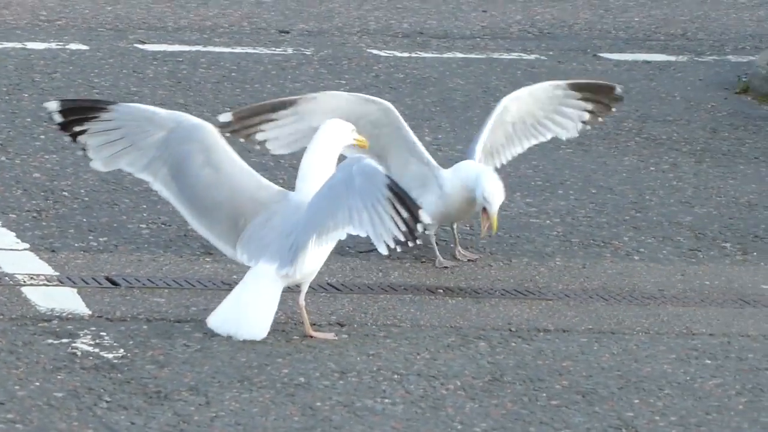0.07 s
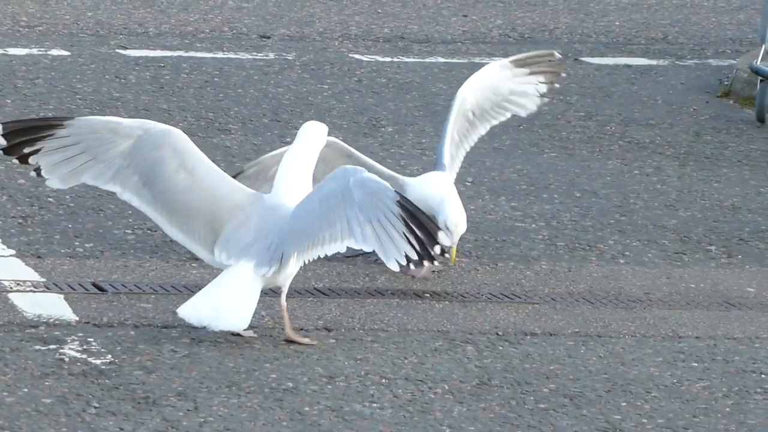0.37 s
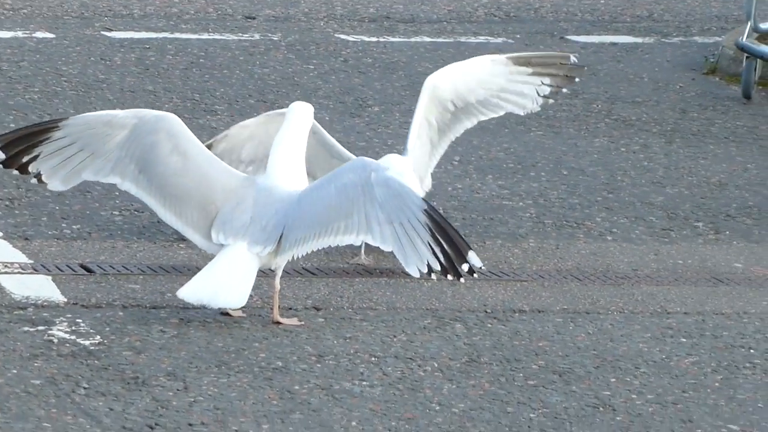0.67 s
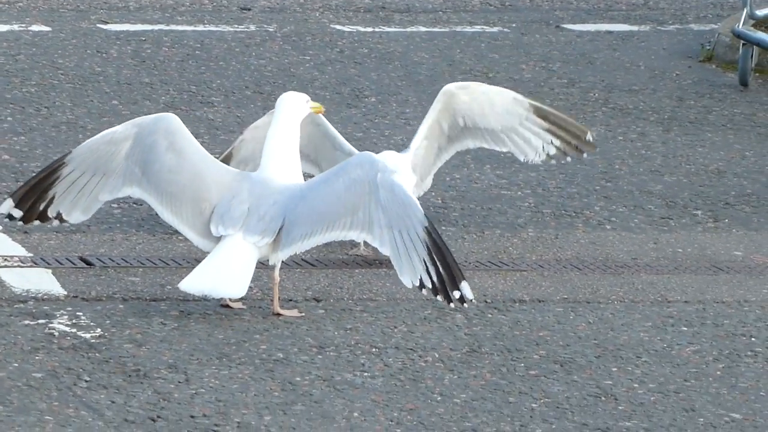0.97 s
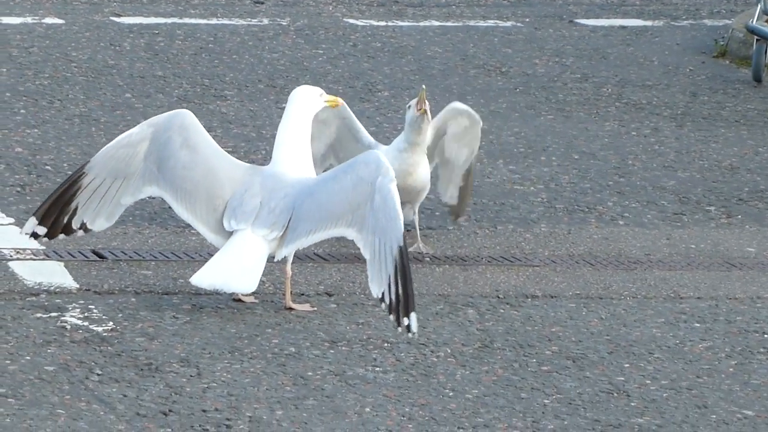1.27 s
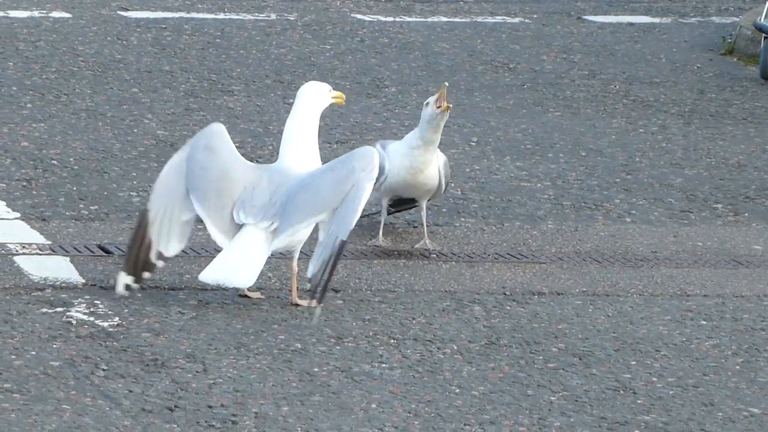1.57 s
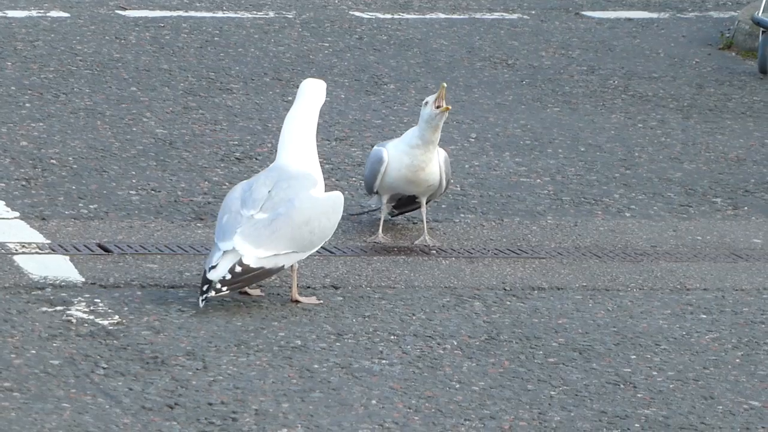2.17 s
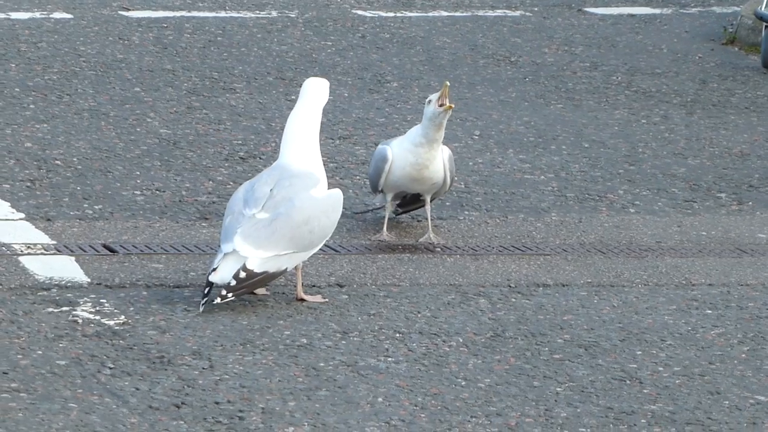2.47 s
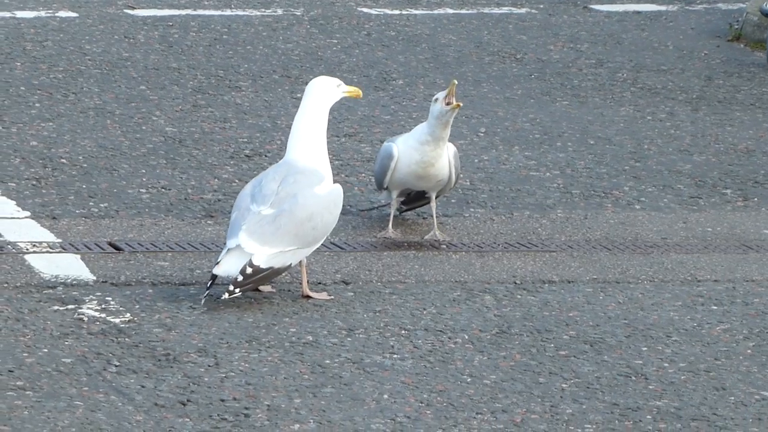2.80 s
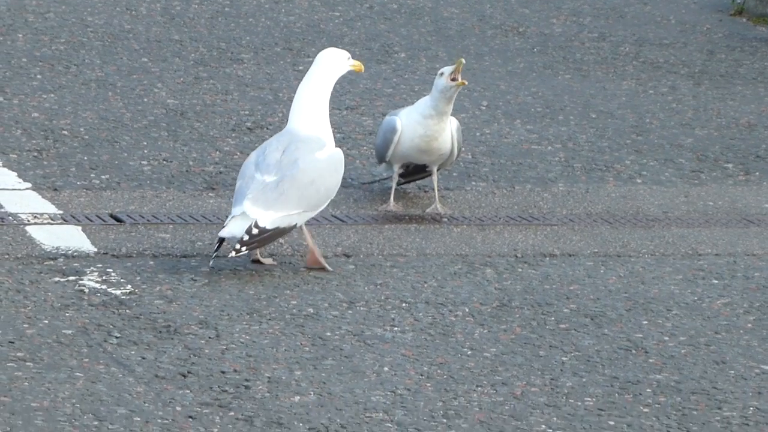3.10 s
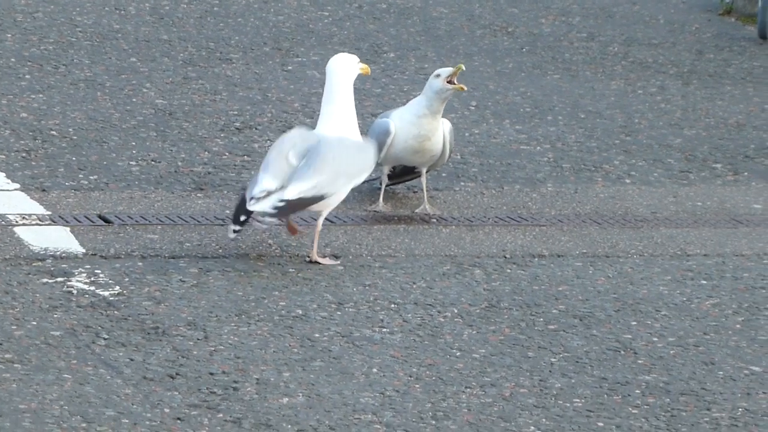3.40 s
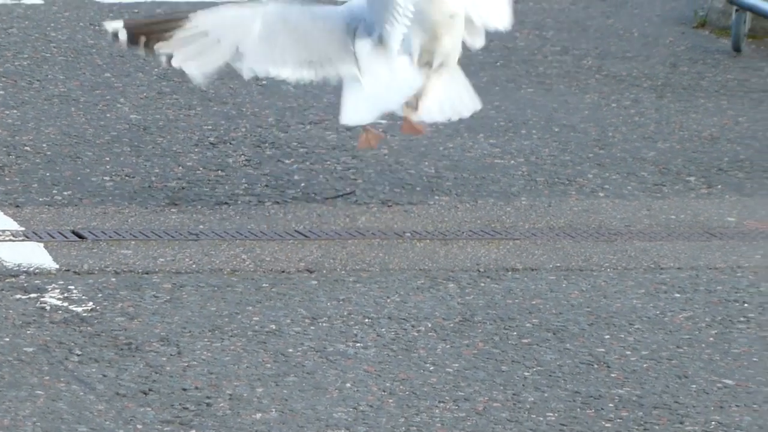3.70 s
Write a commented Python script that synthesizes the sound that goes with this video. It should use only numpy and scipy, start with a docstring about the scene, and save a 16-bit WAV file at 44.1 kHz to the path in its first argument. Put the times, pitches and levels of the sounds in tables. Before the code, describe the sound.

Gull calling on a street, two long cries followed by eight sharp, evenly spaced yelps.

```python
"""A gull, squaring up to another on a road, gives two drawn-out wails that leap into a thin whistle
and crack downwards. It throws its head back for eight yelps, each led by a rasping gasp and a squeak
and ending in a break to a lower register. The voice is wavering harmonics and breath rasp, coloured
by throat, beak and its reflection off the road. Wings thump and rustle, the street echoes,
and light wind and far traffic murmur underneath."""
import sys
import numpy as np
from scipy import signal
from scipy.fft import rfft, irfft, next_fast_len
from scipy.io import wavfile
from scipy.ndimage import uniform_filter1d

SR = 44100
rng = np.random.default_rng(int(sys.argv[2]) if len(sys.argv) > 2 else 0)


def store_wav(level_fs):
    """Save 16-bit WAV to argv[1]."""
    pcm = np.round(np.clip(np.atleast_2d(level_fs), -1, 1) * 32767)
    wavfile.write(sys.argv[1], SR, pcm.T.astype(np.int16))


N = 169785
T = np.arange(N) / SR
CUTOFF_HZ, JITTER_HZ = 15600, 296
ONSET_S = .0035   # a note fades in and out over twice this time

# colour of the call from throat, beak and its reflection off the road: (frequency [Hz], gain [dB])
WAIL_COLOUR = [(1050, -3.5), (1400, 5), (1970, 2), (2500, -15.5), (3300, -4.5), (3800, -34), (4700, -19.5),
               (5600, -31), (15000, -44.5)]
YELP_COLOUR = [(1350, -9), (1700, -27), (2100, -3), (2750, -3.5), (3220, 7.5), (3700, -21), (4100, -11.5),
               (4600, -20.5), (5300, -17), (7300, -33), (8300, -25), (10000, -37.5), (15000, -47)]
# stereo width of noise and echo: (frequency [Hz], side level [dB])
SIDE = [(80, -5.5), (600, -12), (5000, -3)]


def gull_note(contour, colour, fundamental_db=0, extra_jitter=0, harmonics=15):
    """Harmonics and pulsing rasp from the syrinx, given the call's colour; gives (start [s], sound)."""
    # the low register is rough, the whistle clean: (pitch [Hz], jitter [share of pitch], rasp [dB])
    roughness = [(1053, 0.016, -15), (1270, 0.011, -30), (1500, 0.00098, -42.5)]
    edge_from_hz, flutter_db, shimmer_db = 4000, 4, 1.3   # edge is the gain of the high overtones
    times, *columns = np.transpose(contour)
    t = np.arange(times[0] - ONSET_S, times[-1] + ONSET_S, 1 / SR)
    hz, db, edge = [np.interp(t, times, column) for column in columns]
    jitter = (at_hz(roughness, hz) + extra_jitter) * drift(JITTER_HZ, len(t))
    phase = 2 * np.pi * np.cumsum(hz * (1 + jitter)) / SR
    rasp_gain = from_db(at_hz(roughness, hz, column=2) + edge / 2)
    voice = rasp_gain * noise(colour, len(t)) * (1 + np.cos(phase))
    for k in range(1, harmonics + 1):
        high = k * hz > edge_from_hz
        waver = np.where(high, flutter_db, shimmer_db) * drift(53, len(t))
        gain = from_db(at_hz(colour, k * hz) + edge * high + fundamental_db * (k == 1) + waver)
        voice += uniform_filter1d(gain * (k * hz < CUTOFF_HZ), size=128) * np.sin(k * phase)
    gate = np.clip(np.minimum(t - t[0], t[-1] - t) / ONSET_S / 2, 0, 1)
    return t[0], voice * from_db(db) * np.sin(np.pi / 2 * gate) ** 2


def wails():
    """Twice, head low, a mew leaps up to a swelling whistle, then cracks down in two steps."""
    # one contour per note: (time [s], pitch [Hz], level [dB], edge [dB])
    notes = [
        [(0, 1224, -28, 10), (.065, 1155, -28, 3), (.14, 1203, -30, 0.5), (.168, 1333, -28.5, -23)],
        [(.172, 1920, -31.5, -33), (.345, 1985, -16, -18), (.462, 1952, -14.5, -14)],
        [(.468, 1457, -11, -0.5), (.478, 1425, -13.5, 2.5)],
        [(.484, 1162, -13.5, -7), (.509, 1014, -18, -7)],
        [(.749, 1251, -17.5, -24), (.8, 1323, -22.5, -20)],
        [(.812, 1948, -27, -10), (.9, 1970, -26, -24), (.975, 2040, -17.5, -13), (1.038, 2154, -19, 3),
         (1.058, 2117, -15, 10)],
    ]
    # the second wail cracks as the beak opens: (time [s], pitch [Hz], level [dB], edge [dB])
    crack = [(1.061, 1471, -21, 3.3), (1.079, 1335, -26.5, 14), (1.083, 1128, -29.5, 9.7),
             (1.103, 992, -32.5, 19)]
    out = np.zeros(N)
    for contour in notes:
        add(out, *gull_note(contour, WAIL_COLOUR))
    add(out, *gull_note(crack, YELP_COLOUR, fundamental_db=19.5))
    return out


def yelps():
    """Six short yelps and two held ones: each sags in pitch, hardens and breaks."""
    # short yelps: (break time [s], length before the break [s])
    short_yelps = [(1.361, 0.03), (1.665, 0.034), (1.964, 0.052), (2.268, 0.051), (2.568, .047),
                   (2.879, 0.047)]
    # their shared contour: (time from the break [s], pitch [Hz], level [dB], edge [dB])
    shape = [(-.048, 1483, -24.5, -13), (-.033, 1417, -16.5, -4.5), (-.004, 1313, -11.5, -1.5)]
    # one contour per held yelp: (time [s], pitch [Hz], level [dB], edge [dB])
    held_yelps = [
        [(3.115, 1425, -18, -23), (3.15, 1434, -13.5, -13.5), (3.168, 1339, -13.5, -6), (3.192, 1264, -15, 8)],
        [(3.475, 1412, -17.5, -22), (3.512, 1436, -12, -18), (3.532, 1284, -20.5, 5), (3.57, 1216, -22.5, -1)],
    ]
    # strength of each held yelp's break: (gain [dB])
    held_breaks = [1.5, -19]
    out = np.zeros(N)
    (_, *opening), *rest = shape
    for s, lead_s in short_yelps:
        contour = [(s - lead_s, *opening)] + [(s + max(dt, -lead_s), *point) for dt, *point in rest]
        add(out, *gull_note(contour, YELP_COLOUR))
        add(out, *register_break(s, lead_s))
    for contour, db in zip(held_yelps, held_breaks):
        start, end = contour[0][0], contour[-1][0]
        add(out, *gull_note(contour, YELP_COLOUR))
        add(out, *register_break(end + ONSET_S / 2, end - start, db))
    return out


def register_break(start_s, lead_s, gain_db=0):
    """The voice drops to its low register and sinks away; a longer yelp has a longer break."""
    # the low note: (position [share of length], pitch [Hz], level [dB], edge [dB])
    shape = [(0.131, 1101, -16.5, 0.5), (.6, 1023, -21, -5), (1, 965, -18, -3)]
    length_s = .017 + .13 * lead_s
    contour = [(start_s + share * length_s, hz, db + gain_db, edge) for share, hz, db, edge in shape]
    return gull_note(contour, YELP_COLOUR)


def small_calls(edge_db=-13.5, jitter=0.011, squeak_s=0.015):
    """The voice around the yelps: a soft lead-in, rough squeaks and a closing grumble."""
    # rising call before the first yelp: (time [s], pitch [Hz], level [dB])
    soft_call = [(1.214, 1137, -22.5), (1.304, 1245, -31.5)]
    # squeaks ahead of the yelps: (time [s], pitch [Hz], level [dB])
    squeaks = [(1.316, 1995, -16), (1.528, 1159, -23), (1.616, 2037, -13.5), (1.832, 1147, -23),
               (2.141, 1246, -27), (2.447, 1286, -27), (2.757, 1204, -23), (3.077, 1389, -19),
               (3.437, 1403, -16)]
    # low grumble at take-off: (time [s], pitch [Hz], level [dB])
    grumble = [(3.578, 1014, -18), (3.609, 724, -36), (3.652, 818, -24)]
    out = np.zeros(N)
    add(out, *gull_note([(*row, edge_db) for row in soft_call], YELP_COLOUR))
    for s, hz, db in squeaks:
        contour = [(t, hz, db, edge_db) for t in (s, s + squeak_s)]
        add(out, *gull_note(contour, YELP_COLOUR, extra_jitter=jitter))
    contour = [(*row, edge_db) for row in grumble]
    add(out, *gull_note(contour, WAIL_COLOUR, extra_jitter=jitter, harmonics=1))
    return out


def gasps(level_db=-31, half_s=0.0051, lead_s=0.0093):
    """The gull snatches air between calls: a grainy rasp in two puffs, the first half as strong."""
    # peak of each gasp: (time [s])
    peaks = [0.739, 1.208, 1.513, 1.814, 2.12, 2.423, 2.735, 3.049, 3.41]
    # colour of the gasp: (frequency [Hz], gain [dB])
    colour = [(1000, 3.5), (3200, 6), (4000, -7.5), (15000, -40.5)]
    flow = sum(puff(s - lead_s, half_s) / 2 + puff(s, half_s) for s in peaks)
    rasp = rms_one(noise(colour, N) * from_db(2 * drift(JITTER_HZ, N)))
    return from_db(level_db) * flow * rasp


def wings():
    """Each beat pushes a soft thump of air; feathers rustle while the wings are spread."""
    # wing beats: (time [s], level [dB], half length [s])
    beats = [(0.137, -31.5, 0.033), (1.583, -28.5, 0.015), (1.678, -29, 0.015), (2.002, -33, 0.011),
             (3.617, -31, 0.05), (3.744, -27.5, 0.0088), (3.815, -30, 0.0094)]
    # body of the thump: (frequency [Hz], gain [dB])
    thump_colour = [(90, -6.5), (200, 5), (400, -15.5)]
    # swell of the feather rustle: (time [s], level [dB])
    rustle_levels = [(.05, -47), (.2, -52), (.9, -59.5), (1.19, -47), (1.8, -63), (3.35, -59.5),
                     (3.73, -49.5)]
    # hiss of the feathers: (frequency [Hz], gain [dB])
    rustle_colour = [(2500, -8.5), (8500, -12), (14000, -20.5)]
    push = sum(from_db(db) * puff(s, half_s) for s, db, half_s in beats)
    rustle = from_db(np.interp(T, *np.transpose(rustle_levels)) + 2 * drift(45, N))
    return pan(push * wide_noise(thump_colour), left_db=-0.4) + rustle * wide_noise(rustle_colour)


def street_echo(voice, early_db=15, early_s=0.017):
    """House fronts scatter the calls back; the nearest walls answer first and loudest."""
    # reverb tail: (frequency [Hz], level [dB], time to fall 60 dB [s])
    tail = [(990, -6.5, 1), (1243, 7.5, 0.71), (1950, -10.5, 1), (2980, -18, 0.56), (4340, -2, 0.63),
            (6140, -8, 0.13)]
    t, response = T[:SR], np.zeros((2, SR))
    attack = -np.expm1(-t / ONSET_S) * (1 + from_db(early_db) * np.exp(-t / early_s))
    edges_hz = np.geomspace(700, 15000, 15)
    for low, high in zip(edges_hz, edges_hz[1:]):
        hz = np.sqrt(low * high)
        band = signal.butter(2, [low, high], "band", fs=SR, output="sos")
        centre, *sides = signal.sosfilt(band, rng.standard_normal((3, SR)))
        scatter = centre + from_db(at_hz(SIDE, hz)) * np.array(sides)
        envelope = attack * from_db(-60 * t / at_hz(tail, hz, column=2))
        response += from_db(at_hz(tail, hz)) * envelope / np.linalg.norm(envelope) * scatter
    return np.array([signal.fftconvolve(voice, ear)[:N] for ear in response])


def wind_and_traffic(level_db=-39.5, sway_db=1.5):
    """A low bed of light wind and far traffic, swaying a little."""
    # colour of the murmur: (frequency [Hz], gain [dB])
    colour = [(70, -10), (120, 1.5), (1050, -5), (15000, -43)]
    return from_db(level_db + sway_db * drift(5.8, N)) * wide_noise(colour)


def from_db(db):
    """Decibels to gain."""
    return 10 ** (np.asarray(db) / 20)


def rms_one(x):
    """Scale to unit rms."""
    return x / np.sqrt(np.mean(x ** 2) + 1e-20)


def at_hz(table, hz, column=1):
    """Read a column of a table along log frequency."""
    points = np.array(table)
    return np.interp(np.log(np.maximum(hz, 1)), np.log(points[:, 0]), points[:, column])


def drift(rate_hz, size):
    """Smooth random wander with a spread of about 1."""
    pole = np.exp(-2 * np.pi * rate_hz / SR)
    white = rng.standard_normal(size + SR // 10)
    return rms_one(signal.lfilter([1], [1, -2 * pole, pole * pole], white))[-size:]


def noise(colour, size, side=False):
    """Coloured noise, rolled off beyond its table; rms about 1, or turned down by SIDE if a side."""
    n = next_fast_len(size)
    hz = np.maximum(np.fft.rfftfreq(n, 1 / SR), 1)
    skirts = np.minimum(np.minimum(hz / colour[0][0], colour[-1][0] / hz), 1) ** 4
    gain = rms_one(skirts * from_db(at_hz(colour, hz))) * (from_db(at_hz(SIDE, hz)) if side else 1)
    return irfft(rfft(rng.standard_normal(n)) * gain, n)[:size]


def wide_noise(colour):
    """Coloured stereo noise, narrowest in the mids."""
    return rms_one(noise(colour, N) + np.array([[1], [-1]]) * noise(colour, N, side=True))


def puff(peak_s, half_s):
    """A smooth swell and fall around a time."""
    return np.exp(-((T - peak_s) / half_s) ** 2 / 2)


def add(out, start_s, sound):
    """Mix a sound in at a time."""
    i = int(start_s * SR)
    sound, i = sound[max(-i, 0):], max(i, 0)
    out[i:i + len(sound)] += sound[:N - i]


def pan(x, left_db):
    """Lean a sound to the left, or to the right if negative."""
    return x * from_db([[left_db], [-left_db]])


def scene():
    """The gull just left of centre, its echo, and wing thumps and wind a little to the right."""
    head_low = wails()
    head_high = yelps() + small_calls() + gasps()
    echo = street_echo(from_db(-6.5) * head_low + head_high)   # head low, less sound reaches the walls
    gull = pan(head_low + head_high, left_db=0.66)
    return gull + echo + wings() + pan(wind_and_traffic(), left_db=-0.4)


def record(dry):
    """A steep low-pass takes off the very top."""
    return signal.sosfilt(signal.ellip(10, .1, 80, CUTOFF_HZ, fs=SR, output="sos"), dry)


dry = scene()
out = record(dry)
store_wav(out)
```